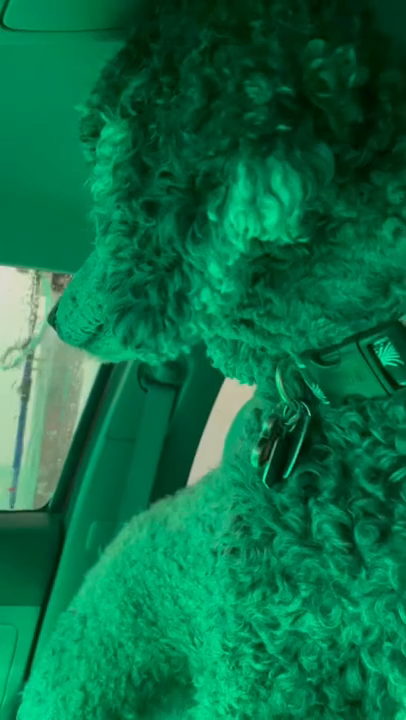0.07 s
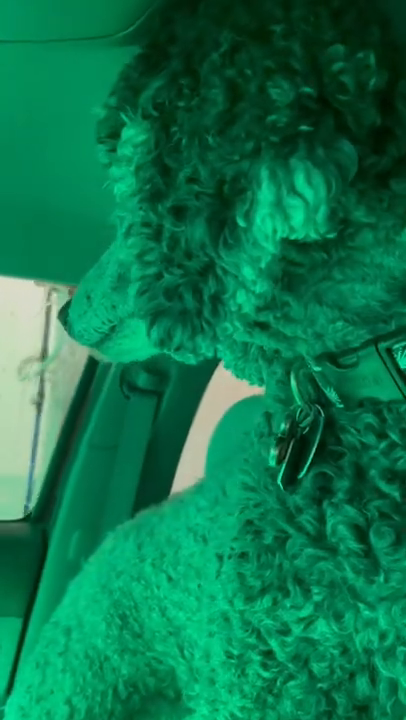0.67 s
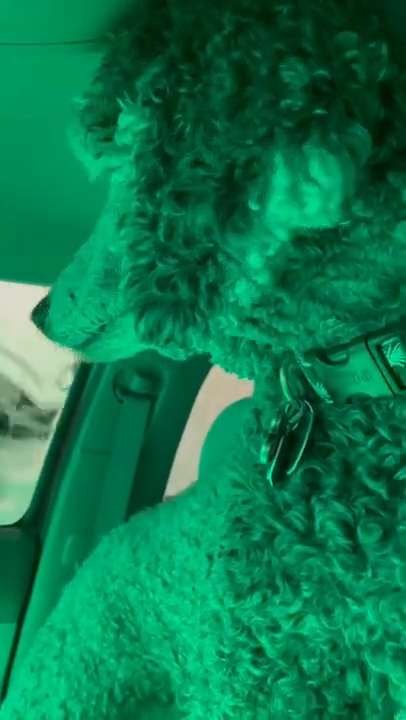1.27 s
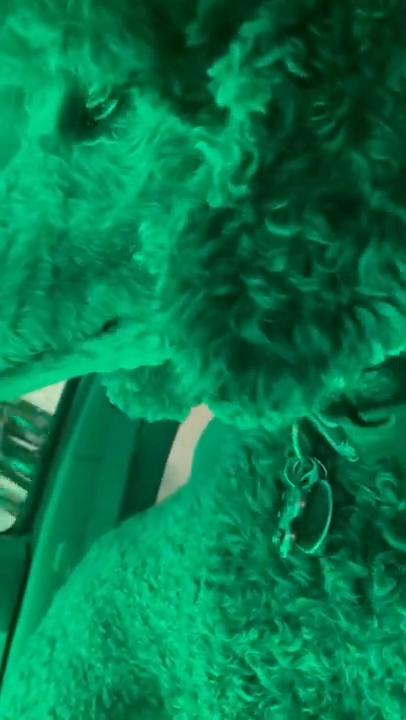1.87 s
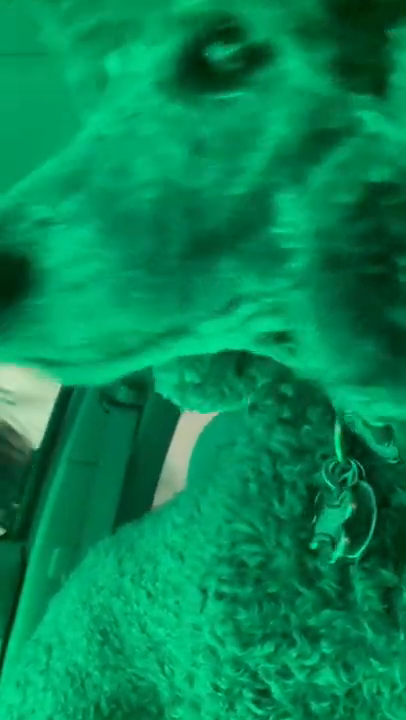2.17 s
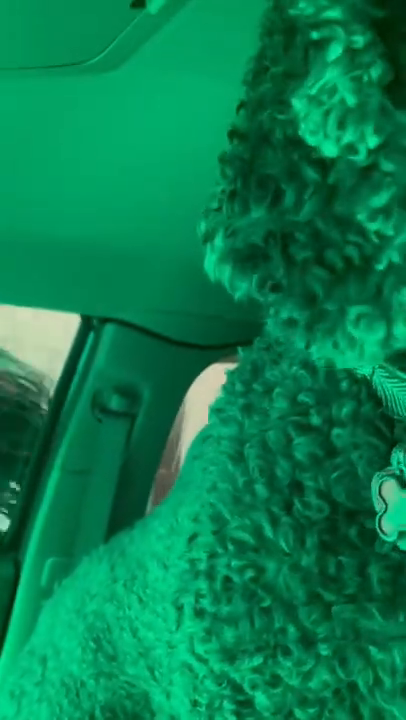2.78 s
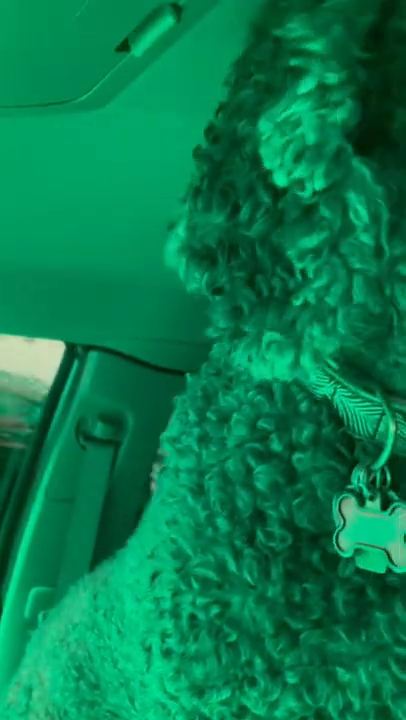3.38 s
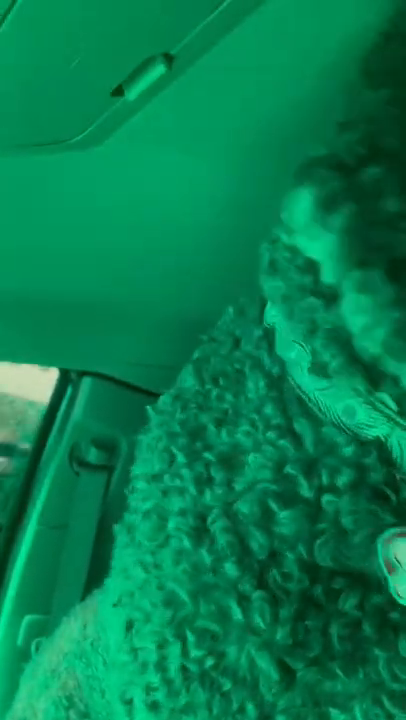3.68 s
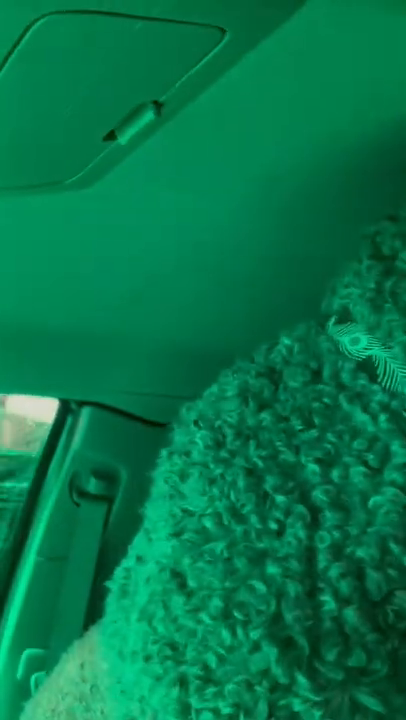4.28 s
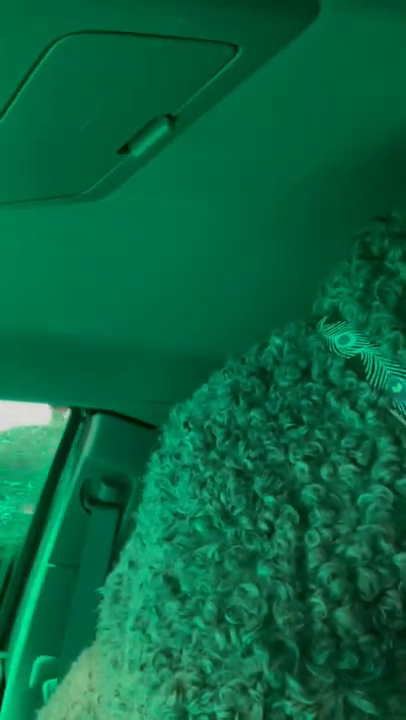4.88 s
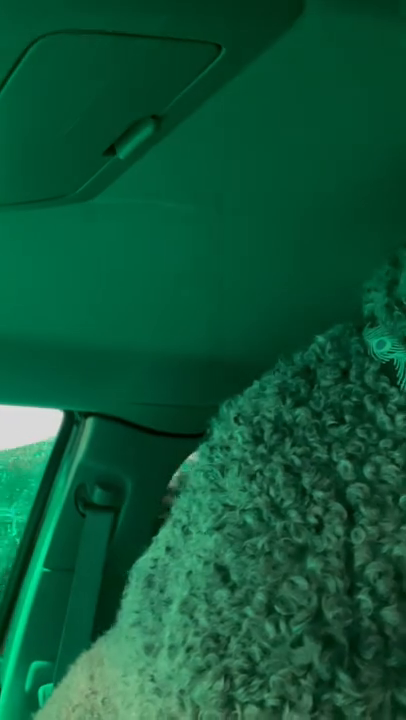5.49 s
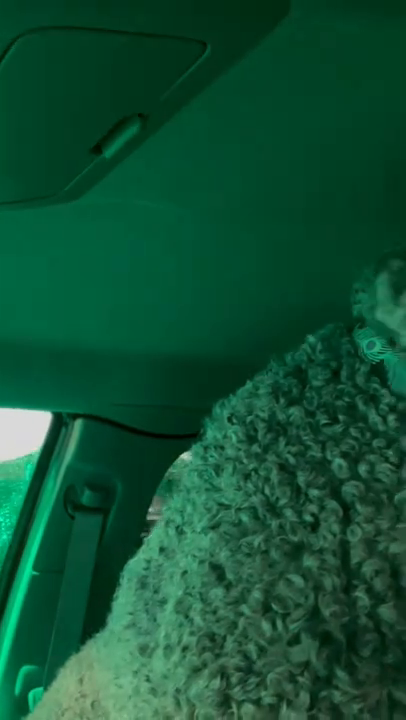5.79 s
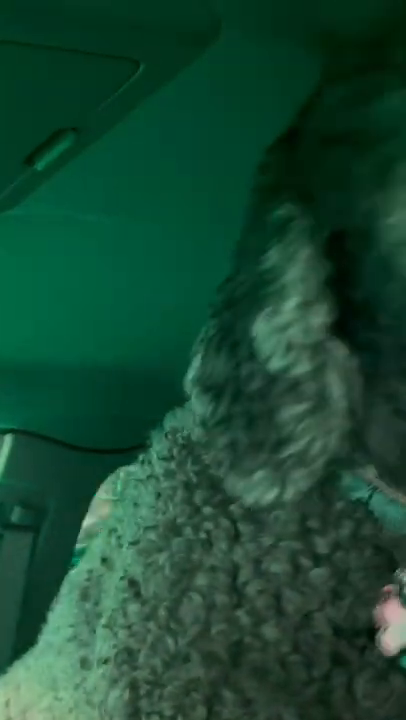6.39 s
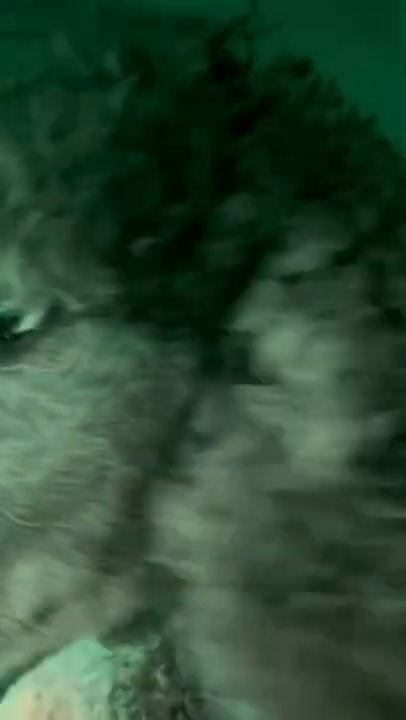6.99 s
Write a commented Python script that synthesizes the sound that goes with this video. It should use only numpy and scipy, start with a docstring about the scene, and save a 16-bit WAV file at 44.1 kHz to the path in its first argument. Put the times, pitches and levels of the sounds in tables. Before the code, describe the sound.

Heard from a seat inside a closed car, a car wash sprays the window with splashy, pattering water over a low rumble. The water thins to scattered drops while the rumble swells and brushes scrub the paint, thumping and humming through the panels. Midway, a cluster of wet slaps hits the glass. Lighter, duller slaps follow, and near the end another brush rubs overhead.

```python
"""Jets of water spatter on the side window of a closed car in an automatic car wash.
Each impact is a pulse with a short ring; some hits ping, and single drops tick in between. As the
brushes close in, their blows force the body panels into a swelling rumble with thumps and hums,
friction on the paint roars, and wet strips slap the glass. Last, a second brush arrives overhead."""
import sys
import numpy as np
from scipy import signal
from scipy.fft import rfft, irfft, next_fast_len
from scipy.io import wavfile
from scipy.ndimage import uniform_filter1d

SR = 44100
rng = np.random.default_rng(int(sys.argv[2]) if len(sys.argv) > 2 else 0)


def wrap_up_sound(samples):
    """Save the sound to the file named by the first command line argument, as 16-bit audio."""
    columns = np.atleast_2d(samples).T
    # keep every value between -1 and 1, then stretch to whole-number steps
    tamed = np.clip(columns, -1, 1)
    steps = np.round(tamed * 32767).astype(np.int16)
    wavfile.write(sys.argv[1], SR, steps)


N = 310905
TIME = np.arange(N) / SR
PADDED = next_fast_len(N + 8192)
HZ = np.maximum(np.arange(PADDED // 2 + 1) * SR / PADDED, 1)
FULL_FORCE_DB = -18

# force of the brushes on the body: t/s, level/dB
BRUSH_FORCE = [(0, -23), (1.3, -23), (1.6, -22.5), (2.8, -19.5), (3.7, -18), (4.7, -18), (5.75, -17.5),
               (6.2, -18), (7.05, -19.5)]
# spectrum of bristles rubbing on paint: f/Hz, relative level/dB
FRICTION_SPECTRUM = [(150, -35), (250, -21.5), (330, 1), (430, -1), (600, -3.5), (800, -5.5), (1000, -21),
                     (1400, -17.5), (2500, -29), (6000, -55.5)]


def from_db(db):
    """Amplitude ratio: tenfold for every 20 dB."""
    return 10 ** (np.asarray(db) / 20)


def unit_rms(x):
    """Normalisation to unit power."""
    return x / np.sqrt(np.mean(x ** 2) + 1e-20)


def in_time(rows):
    """Linear interpolation of a level curve at every sample."""
    return np.interp(TIME, *np.transpose(rows))


def in_hz(rows):
    """Interpolation of each column of a spectrum over log frequency."""
    hz, *columns = np.transpose(rows)
    return [np.interp(np.log(HZ), np.log(hz), column) for column in columns]


def gains(spectrum):
    """Amplitude response of a spectrum given in dB."""
    return from_db(in_hz(spectrum)[0])


def coloured(x, gain):
    """Linear filtering, scaled so that white noise keeps its power."""
    return irfft(rfft(x, PADDED) * unit_rms(gain), PADDED)[..., :N]


def resonances(modes):
    """Amplitude response of steep-sided modes: driven independently, they add in power."""
    return np.sqrt(sum(from_db(db) ** 2 / (1 + ((HZ - hz * hz / HZ) / width) ** 2 / 2) ** 2
                       for hz, width, db in modes))


def drift(corner_hz, size=2048):
    """Random modulation: low-pass noise of about unit spread."""
    hz = np.arange(size // 2 + 1) * SR / N
    slow = irfft(rfft(rng.standard_normal(size)) / (1 + (hz / corner_hz) ** 2))
    return np.interp(TIME, np.linspace(0, N / SR, size), unit_rms(slow))


def driven(full_db, exponent):
    """Power law: the level in dB of a sound that follows the force of the brushes."""
    return full_db + exponent * (in_time(BRUSH_FORCE) - FULL_FORCE_DB)


def droplets(per_s, spread_db, cycles, crack, pitches=20):
    """Shot noise: random impacts, mostly small, each a click and a ring falling 60 dB over `cycles`."""
    chance, size, polarity, pitch = rng.random((4, N), dtype=np.float32)
    at = np.flatnonzero(chance < per_s / SR)
    sizes = from_db(spread_db * np.minimum(-np.log1p(-size[at]), 4)) * np.sign(polarity[at] - .5)
    band = (pitch[at] * pitches).astype(int)
    clicks, rings = np.full(N, 1e-18), np.zeros(N)
    for k, hz in enumerate(np.geomspace(400, 15000, pitches)):
        r, w = from_db(-60 * hz / (cycles * SR)), 2 * np.pi * hz / SR
        clicks[at] = sizes * (band == k) * np.sqrt(hz * (1 - r * r)) + 1e-18  # keeps the sum white
        rings += signal.lfilter([1, 0, -1 + 1e-6], [1, -2 * r * np.cos(w), r * r], clicks)
    clicks[at] = sizes
    return unit_rms(unit_rms(rings) + crack * unit_rms(clicks))


def cluster(smoothing_s=0.00074):
    """Dense shot noise of even power; each wet hit is a short burst of it."""
    impacts = droplets(per_s=12000, spread_db=1.5, cycles=7, crack=0.65)
    power = np.abs(uniform_filter1d(impacts ** 2, int(smoothing_s * SR)))
    return impacts / np.sqrt(power + 1e-9)


def bursts(events, rise_s):
    """Envelope of incoherent hits, added in power: each has a fast rise and a Gaussian decay."""
    power = np.zeros(N)
    for s, db, length in events:
        start = np.clip(int(s * SR), 0, N)
        t = TIME[:min(N - start, SR // 4)]
        envelope = from_db(db) * (1 - np.exp(-t / rise_s)) * np.exp(-(t / length) ** 2 / 2)
        power[start:start + len(t)] += envelope ** 2
    return np.sqrt(power)


def splats(events, rise_s, body_hz=1310, treble_hz=4200):
    """Wet hits as noise bursts in three complementary bands: body, middle and treble."""
    s, db, length, body_db, treble_db = np.transpose(events)[:5]
    body = 1 / (1 + (HZ / body_hz) ** 4)
    treble = 1 / (1 + (treble_hz / HZ) ** 8)
    impacts = rfft(cluster(), PADDED)
    bands = [(body, body_db), (1 - body - treble, 0), (treble, treble_db)]
    return sum(irfft(impacts * share, PADDED)[:N] * bursts(zip(s, db + extra_db, length), rise_s)
               for share, extra_db in bands)


def cabin(x, direct, t60_s=0.05, size=2048):
    """Reverberation, in a shared and a diffuse row; the echoes change as the water lands elsewhere."""
    blocks = np.pad(x, (0, -N % size)).reshape(-1, size)
    echoes = rng.standard_normal((2, len(blocks), size)) * from_db(-60 * TIME[:size] / t60_s)
    echoes /= np.sqrt(np.sum(echoes ** 2, axis=2, keepdims=True))
    echoes[0] *= np.sqrt(1 - direct)
    echoes[0, :, 0] += np.sqrt(direct)
    wet = irfft(rfft(blocks, 2 * size) * rfft(echoes, 2 * size))
    wet[:, 1:, :size] += wet[:, :-1, size:]  # tails run on into the next block
    return wet[:, :, :size].reshape(2, -1)[:, :N]


def jets(from_s=0.41, until_s=0.92, rise_db_per_s=29.5, fall_db_per_s=21, sputter_db=2):
    """Impact noise: a passing jet and runoff drum on the window, with gushes and ringing large drops."""
    # thickest gushes: t/s, relative level/dB, length/s, extra body/dB, extra treble/dB
    gush_hits = [(0.036, -20.5, 0.0091, 4.5, -3), (0.112, -29.5, 0.0076, 7.5, 12.5),
                 (0.125, -22.5, 0.019, 4, 2.5), (0.254, -21.5, 0.018, -2, -1), (0.330, -29, 0.014, 5.5, -7),
                 (0.385, -32, 0.0083, 6, 4.5), (0.461, -22.5, 0.014, 2, -1), (0.546, -23, 0.024, -12, 1),
                 (0.600, -26.5, 0.023, 9, -1), (0.642, -19, 0.006, 2.5, 3.5), (0.692, -28, .016, 2, 1.5),
                 (0.828, -27, 0.0059, -4, -9), (0.915, -20.5, .012, -4.5, 1),
                 (0.953, -22.5, 0.011, 3.5, 5.5), (1.006, -14, 0.0017, 5, -4), (1.013, -17, 0.01, 4, 3),
                 (1.091, -17, 0.0036, -4, 4.5), (1.105, -19, 0.013, 2, 2.5),
                 (1.220, -23.5, 0.017, 4.5, 0.5), (1.277, -26, 0.0041, -1, 4.5),
                 (1.316, -23, 0.021, -3, -4.5), (1.395, -27, .007, -5, 2), (1.437, -30.5, 0.057, 3, 4),
                 (1.722, -26, 0.02, -3.5, -1.5), (1.808, -24, 0.012, 4.5, 1.5)]
    # tone of the spray (the gap near 12 kHz is a filter effect): f/Hz, relative level/dB
    spray_tone = [(200, -6.5), (450, 10), (600, 10), (900, 12), (1100, 12.5), (1400, 1.5), (2100, -2.5),
                  (2700, 3), (3300, 2.1), (3900, -3), (4700, -5), (6200, -13), (9000, -14.5),
                  (12000, -58.5), (14200, -24), (15500, -48)]
    # band in which large drops ring: f/Hz, width/Hz, relative level/dB
    plink_modes = [(4460, 1000, 0)]
    approach_db = -rise_db_per_s * np.maximum(from_s - TIME, 0)
    retreat_db = -fall_db_per_s * np.maximum(TIME - until_s, 0)
    jet = from_db(-27 + approach_db + retreat_db)
    runoff = from_db(driven(-41, exponent=2.5))
    spray = droplets(per_s=1300, spread_db=2.5, cycles=8, crack=0.65) * np.hypot(jet, runoff)
    spray = cabin(spray * from_db(sputter_db * drift(40)), direct=0.53)
    gushes = cabin(splats(gush_hits, rise_s=0.00017), direct=0.83) * from_db(2)
    plinks = droplets(per_s=700, spread_db=2.8, cycles=24, crack=0) * jet * from_db(-14)
    plinks = coloured(cabin(plinks, direct=0.38), resonances(plink_modes))
    return coloured(spray + gushes, gains(spray_tone)) + plinks


def rumble(throb_db=1.0, damping_db=3):
    """Forced vibration: countless soft brush blows excite the roof, side panels and cabin air."""
    # modes of each: f/Hz, width/Hz, relative level/dB
    roof_modes = [(78, 15, -4.5), (99.4, 24, -9)]
    panel_modes = [(128.7, 28.4, -1), (163.6, 46, -1), (240, 38, -7.5), (293.3, 34, -7)]
    air_modes = [(31, 13, -7.5), (47.3, 27, -0.5)]
    damped_db = damping_db * from_db(overhead_nearness())  # the brush overhead damps the roof
    roof_db = driven(-20.5, exponent=1.46) - damped_db
    panel_db = in_time(BRUSH_FORCE) - 1.5 + throb_db * drift(24)
    air_db = driven(-29.5, exponent=0.2)
    return sum(coloured(rng.standard_normal((2, N)), resonances(modes)) * from_db(db)
               for modes, db in [(roof_modes, roof_db), (panel_modes, panel_db), (air_modes, air_db)])


def scrub(roar_flutter_db=1.3, water_flutter_db=1.2, diffuse_db=-2.5):
    """Friction noise: bristles roar on the paint; flung water hisses far off and patters nearby."""
    # rubbing on the paint: t/s, level/dB
    rubbing = [(0, -26.5), (1.5, -28), (2.4, -23.5), (3.1, -25.5), (3.6, -25), (4.3, -26), (5.1, -23),
               (7.05, -23.5)]
    # tone of the hiss (the gap near 11 kHz is a filter effect): f/Hz, relative level/dB
    hiss_tone = [(300, -15), (600, -11.5), (1000, 11.5), (1350, 3), (1800, -6), (2600, -3), (4000, -9.5),
                 (5500, -16), (8000, -20.5), (11000, -57), (14200, -28.5), (15500, -56)]
    roar = rng.standard_normal((2, N)) * from_db(in_time(rubbing) + roar_flutter_db * drift(20))
    roar[1] *= from_db(diffuse_db)
    hiss = rng.standard_normal((2, N)) * from_db(-3.5)
    patter = cabin(droplets(per_s=4000, spread_db=3.5, cycles=7.4, crack=0.9), direct=0.41)
    water_db = driven(-37.5, exponent=1) + water_flutter_db * drift(45)
    water = (hiss + from_db(5.5) * patter) * from_db(water_db)
    return coloured(roar, gains(FRICTION_SPECTRUM)) + coloured(water, gains(hiss_tone))


def pings(t60_s=0.066):
    """Free vibration: a hit that lands squarely rings briefly at a bright pitch of its own."""
    # square hits: t/s, f/Hz, level/dB
    hits = [(0.116, 4680, -24.5), (0.166, 4700, -25), (0.257, 3180, -19.5), (0.507, 3900, -25.5),
            (0.594, 4780, -21.5), (3.557, 4580, -21), (3.716, 2540, -23.5)]
    out = np.zeros(N)
    for s, hz, db in hits:
        t = np.maximum(TIME - s, 0)
        out += from_db(db - 60 * np.minimum(t / t60_s, 2)) * np.sin(2 * np.pi * hz * t)
    return cabin(out, direct=1.0)


def drops(length_s=0.0022, gain_db=-0.5):
    """A short pulse has a broad spectrum: single drops burst with a crisp tick."""
    # landings: t/s, relative level/dB
    landings = [(0.132, -25), (1.012, -22), (3.213, -22), (4.041, -24), (5.327, -29.5), (5.449, -27),
                (6.056, -26.5)]
    # tone of the ticks: f/Hz, relative level/dB
    tick_tone = [(800, -39), (2500, -6.5), (4500, 2), (8000, -4.5), (11000, -5.5), (15000, -13)]
    ticks = cluster() * bursts([(s, db, length_s) for s, db in landings], rise_s=0.00024)
    return from_db(gain_db) * coloured(cabin(ticks, direct=0.62), gains(tick_tone))


def thumps(peak_s=0.038):
    """Damped oscillation: a side panel booms briefly under each heavy strip."""
    # blows on the panel: t/s, f/Hz, level/dB
    blows = [(0.192, 173, -21), (1.613, 123.4, -21), (1.747, 158.7, -19.5), (2.109, 146.2, -16.5),
             (3.652, 159, -17.5), (4.074, 157, -21), (4.727, 163.8, -16.5), (5.647, 174.3, -19),
             (6.312, 147.7, -19), (6.656, 169.7, -17)]
    out = np.zeros(N)
    for s, hz, db in blows:
        t = np.maximum(TIME - s, 0)
        envelope = t / peak_s * np.exp(1 - t / peak_s)
        out += from_db(db) * envelope * np.sin(2 * np.pi * hz * t)
    return np.array([out, np.zeros(N)])


def drones(waver_hz=2.0, ripple_db=1.5, fade_s=0.26):
    """Sustained forcing: a spinning brush pressing on the body holds it in a wavering hum."""
    # spells of steady pressure: start t/s, end t/s, f/Hz, level/dB
    presses = [(2.586, 3.802, 48.3, -21.5), (3.998, 4.75, 78, -24)]
    out = np.zeros(N)
    for start, end, hz, db in presses:
        contact = np.clip(np.minimum(TIME - start, end - TIME) / fade_s, 0, 1)
        phase = 2 * np.pi * np.cumsum(hz + waver_hz * drift(5.3)) / SR
        out += contact * from_db(db + ripple_db * drift(6)) * np.sin(phase)
    return np.array([out, np.zeros(N)])


def ring(x, hz, width):
    """A two-pole resonator, with unit gain at its centre, rings on after a blow."""
    r = np.exp(-np.pi * width / SR)
    poles = [1, -2 * r * np.cos(2 * np.pi * hz / SR), r * r]
    return signal.lfilter((1 - r * r) / 2 * np.array([1, 0, -1]), poles, x + 1e-18)


def slaps(gain_db=-3):
    """Impact excitation: wet strips set the glass ringing, most when they land squarely."""
    # hardest slaps: t/s, relative level/dB, length/s, extra body/dB, extra treble/dB, ringing/dB
    hard_slaps = [(3.350, -29.5, 0.036, -3, 2.5, -9), (3.443, -30.5, 0.012, -9, 6, -6),
                  (3.482, -26.5, 0.019, -2, 2, -17), (3.506, -24.5, 0.0073, -20, 5.5, -25),
                  (3.556, -26, 0.015, -7, 4, -9), (3.572, -22, 0.017, -7.5, 2.5, -9),
                  (3.617, -19.5, 0.0087, 0.5, 0, -16), (3.668, -29, 0.019, 5, 4, -15),
                  (3.690, -21, 0.0091, 8, -7, -7), (3.715, -14, 0.0032, 9.5, -3, -1),
                  (3.797, -19.5, 0.011, 6, 0, -3), (3.871, -23.5, 0.011, -1.5, 6, -9),
                  (4.261, -25, 0.0065, -3, -8, -0.5), (4.999, -24.5, 0.0046, 0, 0.5, -8),
                  (5.523, -25, 0.0056, 2, -4, -11), (5.750, -26, 0.015, 6, 1, -20)]
    # tone of the slaps (the gap near 12 kHz is a filter effect): f/Hz, relative level/dB
    slap_tone = [(250, -9.5), (700, 10.5), (1100, 0.5), (1600, 2), (2550, -3), (3100, 3), (3900, -0.5),
                 (4600, 0), (6200, -7), (9000, -10), (12000, -33), (15000, -19.5)]
    # modes of the glass: f/Hz, width/Hz, gain/dB
    glass_modes = [(1100, 47, 5.5), (2590, 70, 11.5), (3800, 76, 14), (3900, 50, 3)]
    events, colour = hard_slaps + light_slaps(), gains(slap_tone)
    hits = coloured(cabin(splats(events, rise_s=0.00028), direct=1.0), colour)
    ring_events = [(s, db + ring_db, length) for s, db, length, _, _, ring_db in events]
    blows = cluster() * bursts(ring_events, rise_s=0.00024)
    blows = coloured(cabin(blows, direct=0.92), colour)
    ringing = sum(from_db(db) * ring(blows, hz, width) for hz, width, db in glass_modes)
    return from_db(gain_db) * (hits + ringing)


def light_slaps(from_s=4.5, per_s=9.8, count=21, length_s=0.012, treble_db=-6, ring_db=-8.5):
    """Quasi-periodic impacts: one dull touch for each strip that comes round, as rows for slaps()."""
    return [(from_s + (k + late / 4) / per_s, -30.5 + 1.5 * hard, length_s, 0, treble_db, ring_db)
            for k, (late, hard) in enumerate(rng.standard_normal((count, 2)))]


def overhead_nearness(arrival_s=5.8, rise_db_per_s=18):
    """Level rises as distance falls: the overhead brush, in dB relative to where it comes to stay."""
    return -rise_db_per_s * np.maximum(arrival_s - TIME, 0)


def overhead_brush(diffuse_db=-19.5, flutter_db=1.85, tilt_db_per_octave=-2.5, roof_ring_db=-5):
    """Friction overhead excites the roof's modes and reaches left and right nearly in phase."""
    # modes of the rubbed roof: f/Hz, width/Hz, relative level/dB
    roof_modes = [(340, 54, 2.5), (915, 95, -10.5)]
    level_db = -27.5 + overhead_nearness() + flutter_db * drift(8.3)
    friction = unit_rms(gains(FRICTION_SPECTRUM) * from_db(tilt_db_per_octave * np.log2(HZ)))
    roof = from_db(roof_ring_db) * unit_rms(resonances(roof_modes))
    shared, diffuse = coloured(rng.standard_normal((2, N)), friction + roof) * from_db(level_db)
    return shared + from_db(diffuse_db) * diffuse * [[1], [-1]]


def stereo_processing(pair):
    """Phone-style stereo processing sets left/right phase, coherence and balance per frequency."""
    # f/Hz, left phase lead/rad, coherence (0-1), left minus right level/dB
    stereo_image = [(35, 0, 1, 0), (70, 0.1, 0.995, 0.3), (115, 0.25, 0.98, 1.5), (170, 0.43, 0.96, 4.2),
                    (300, 0.95, 0.82, 7), (450, 2.7, 0.82, 5), (700, 3.2, 0.87, 4), (1250, 3.75, 0.68, 3.1),
                    (2150, 6.2, 0.65, -1), (2550, 6.1, 0.4, 0), (3050, 3.6, 0.36, 2), (3600, 6.1, 0.5, 0),
                    (4400, 6.6, 0.5, -2), (4950, 4, 0.15, -1.8), (5600, 6.5, 0.7, 0.3),
                    (7800, 8.3, 0.76, 0), (9100, 9.4, 0.95, 0), (11600, 9.45, 0.9, 0),
                    (13700, 12.4, 0.87, 0)]
    lead, coherence, balance_db = in_hz(stereo_image)
    shared, diffuse = rfft(pair, PADDED) * np.sqrt([1 + coherence, 1 - coherence])
    left = (shared + diffuse) / np.sqrt(1 + from_db(-2 * balance_db))
    right = (shared - diffuse) / np.sqrt(1 + from_db(2 * balance_db)) * np.exp(-1j * lead)
    return irfft(np.array([left, right]), PADDED)[:, :N]


def scene():
    """Superposition of water and brushes, heard from the seat."""
    pair = jets() + rumble() + scrub() + pings() + drops() + thumps() + drones() + slaps()
    return stereo_processing(pair) + overhead_brush()


def record(dry, opens_s=0.035, cutoff_hz=15600):
    """Gating and band limiting: a moment of silence, then the sound with its highest treble cut."""
    low_pass = signal.ellip(10, .1, 90, cutoff_hz, fs=SR, output="sos")
    return signal.sosfilt(low_pass, dry * (TIME >= opens_s))


dry = scene()
out = record(dry)
wrap_up_sound(out)
```